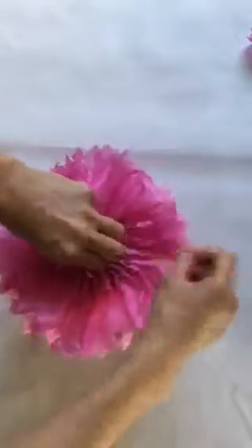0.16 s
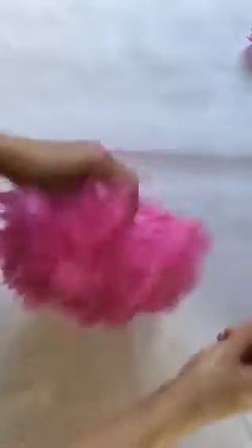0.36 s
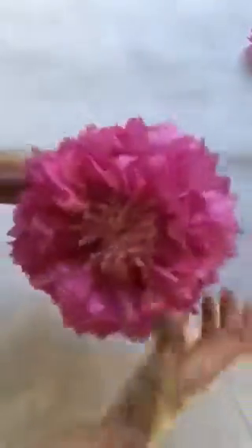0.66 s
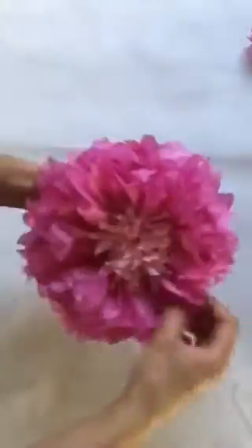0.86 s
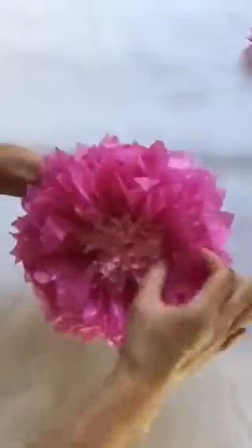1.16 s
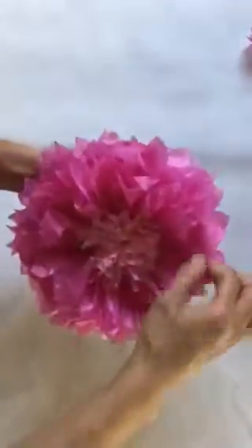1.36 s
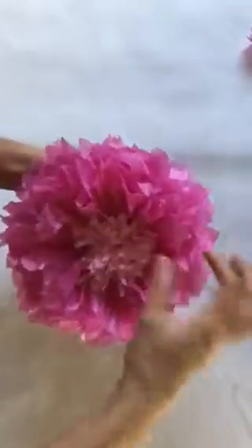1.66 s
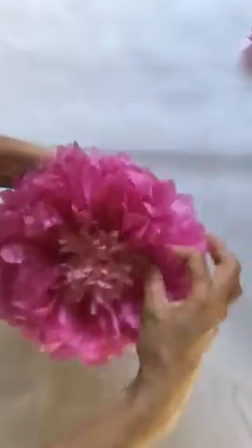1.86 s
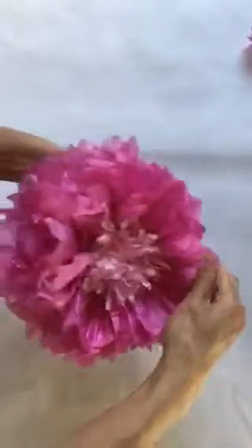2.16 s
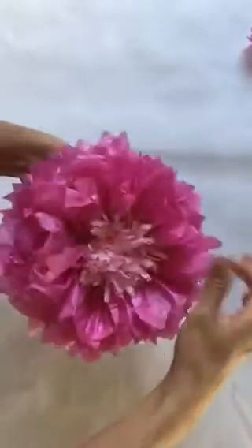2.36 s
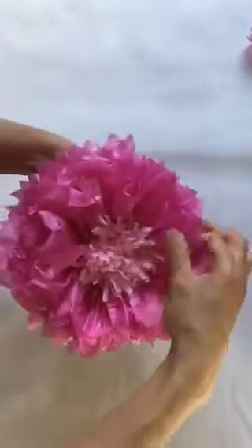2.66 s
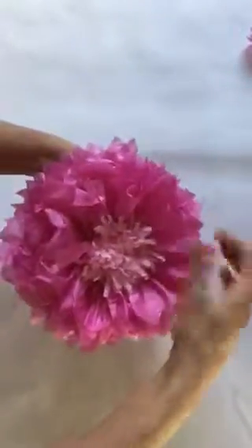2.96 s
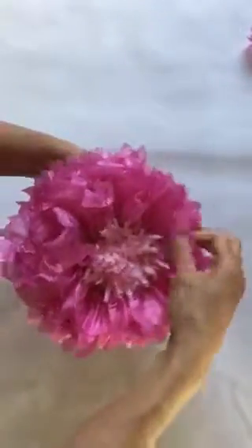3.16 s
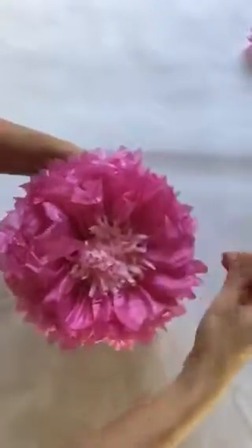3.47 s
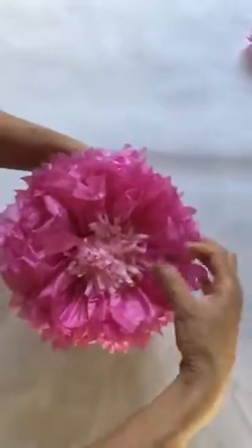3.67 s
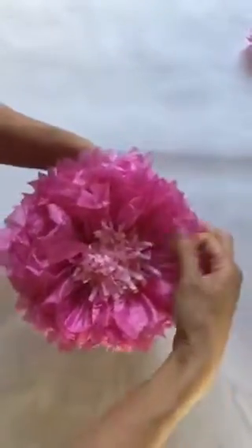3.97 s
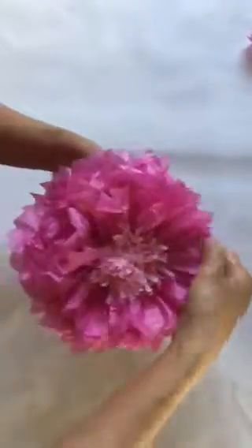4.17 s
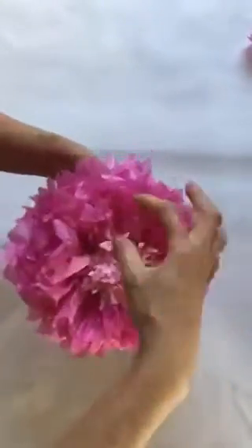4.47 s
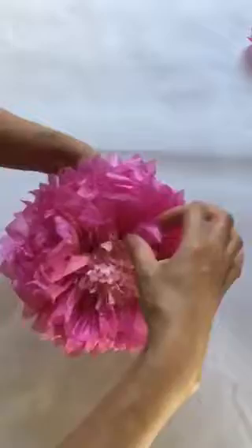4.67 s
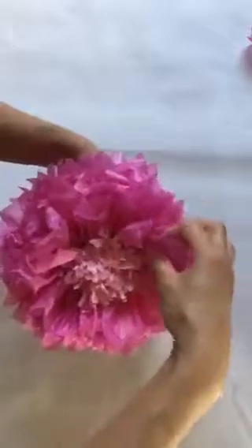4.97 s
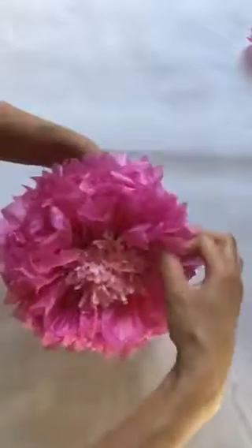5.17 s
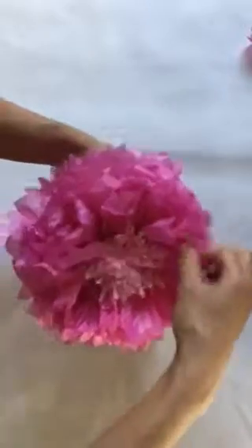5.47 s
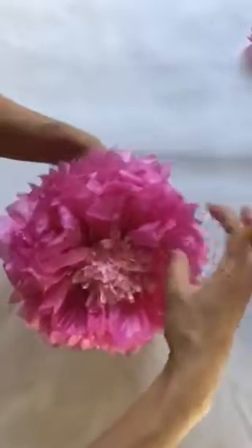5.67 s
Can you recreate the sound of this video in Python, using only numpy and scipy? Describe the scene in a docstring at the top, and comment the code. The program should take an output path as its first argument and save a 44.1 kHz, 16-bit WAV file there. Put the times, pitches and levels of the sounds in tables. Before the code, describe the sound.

Fingers pull apart and fluff a tissue paper flower, close to the microphone in a small, quiet room. Each tug is a short, bright shower of tiny crackles over a soft hiss of sliding sheets, with single creases popping sharply on top. A strong burst comes at about 0.2 seconds, along with a soft, dull hand bump. The paper quietens from 0.4 to 0.8, then crackles fully again around 0.9 and from 1.3 to 1.6. After a brief dip, uneven pulls run from 1.9 to 3.4, with another faint bump near 2. A short lull follows around 3.6. From 3.8 the tugs come close together, strongest near 4.1, 4.3, 4.7 and 5.6, where the sharpest snap sounds, and they ease off by 5.8. Faint room air and a low, wavering hum lie underneath throughout.

```python
"""A burst of crisp crackle: fingers pull apart and fluff a tissue-paper pompom, close up in a small room.
Pull after pull builds, holds and is let go. Each sets off a shower of tiny crease snaps that tick, shake
the petals and flap the whole sheets, over the soft hiss of layers sliding on each other. Single creases
pop out on top and the hand now and then bumps the bundle. Room air and a low hum lie underneath."""
import sys
import numpy as np
from scipy import signal
from scipy.fft import rfft, irfft
from scipy.io import wavfile
from scipy.ndimage import uniform_filter1d

SR = 44100
rng = np.random.default_rng(int(sys.argv[2]) if len(sys.argv) > 2 else 0)


def wrap_up_sound(samples):
    """Save the sound to the file named by the first command line argument, as 16-bit audio."""
    columns = np.atleast_2d(samples).T
    # keep every value between -1 and 1, then stretch to whole-number steps
    tamed = np.clip(columns, -1, 1)
    steps = np.round(tamed * 32767).astype(np.int16)
    wavfile.write(sys.argv[1], SR, steps)


N = 257103

# tone of the quiet room: (frequency [Hz], relative level [dB])
AIR_COLOUR = [(15, -36), (42, 5), (100, -3.5), (250, -5), (600, -11.5), (1600, -15), (5000, -26),
              (16000, -31)]
# swells and fades of the low hum: (time [s], relative level [dB])
HUM_SWELLS = [(0, -65), (0.6, -65.5), (1.7, -77), (2.05, -81), (2.35, -69.5), (2.9, -80), (3.25, -63),
              (3.65, -65), (4.1, -76), (4.4, -61.5), (5.3, -70.5), (5.8, -62)]
# dull knocks of the hand on the bundle: (time [s], relative level [dB])
HAND_BUMPS = [(0.192, -45), (0.234, -44), (1.697, -54.5), (1.749, -60), (1.982, -49.5), (3.579, -64),
              (5.219, -54)]
# tone of a knock: (frequency [Hz], relative level [dB])
BUMP_COLOUR = [(25, -34.5), (60, 3.5), (110, 3), (185, 9.0), (280, 5.5), (900, -46)]
# single creases that pop out of the crackle: (time [s], rms level as if spread over POP_S [dB])
CREASE_POPS = [(0.1398, -49), (0.2542, -23.5), (0.29, -27.5), (0.3961, -30.5), (0.4266, -39),
               (0.4677, -42.5), (0.504, -48), (0.582, -46), (0.6056, -49), (0.8291, -36), (1.1239, -44.5),
               (1.252, -43.5), (1.334, -32), (1.3862, -30), (1.3939, -25), (1.4497, -30), (1.803, -46.5),
               (1.8958, -33.5), (1.9418, -34), (1.9981, -24.5), (2.1146, -33), (2.2587, -32.5),
               (2.361, -37.5), (2.562, -55), (2.7198, -35), (2.7944, -32), (2.917, -31), (3.1204, -61),
               (3.153, -47), (3.2165, -28), (3.3355, -28), (3.4612, -42), (3.5007, -40), (3.8081, -33),
               (3.911, -39.5), (3.9714, -31.5), (3.996, -34), (4.049, -24.5), (4.0604, -26), (4.094, -26),
               (4.4396, -43.5), (4.4661, -42), (4.6175, -28), (4.72, -35), (4.8139, -32), (5.0333, -30),
               (5.071, -30), (5.1635, -26), (5.2088, -29), (5.3881, -35.5), (5.4698, -30.5), (5.506, -32),
               (5.6135, -21), (5.6657, -31)]
# tone of a pop: (frequency [Hz], relative level [dB])
CREASE_POP_COLOUR = [(100, -27), (500, -12.5), (1500, -8), (5000, -9.5), (9000, -5), (14000, 4.5),
                     (16000, 0), (17500, -17)]
# tone of the crackling paper: (frequency [Hz], relative level [dB])
PAPER_COLOUR = [(40, -24), (130, -15.5), (300, -8), (560, -5), (780, -7), (950, -2.5), (1450, 0),
                (2000, -4), (2800, -1.5), (4900, -1.5), (6000, 2), (7800, -1), (12000, 4.5), (15000, 7)]
# narrow rings of the bundle and its surroundings: (frequency [Hz], width [Hz], gain [dB])
BUNDLE_RINGS = [(237, 42, -11), (342.8, 7.2, 7), (480, 82, -9.5), (640, 13, 6), (1360, 79, -12),
                (9220, 900, -15)]
# pulls of the fingers, each opening a hollow in the paper: (time of full strength [s], growth time [s],
# hold [s], crackle drive [dB], extra body [dB], hollow pitch [Hz], hollow boost [dB])
FINGER_PULLS = [(0.0, 0.009, 0.05, -63.0, 0.0, 1070, 5), (0.149, 0.0093, 0.027, -41.5, -2.0, 940, 6),
                (0.186, 0.013, 0.1, -30.0, -0.5, 943, 3.5), (0.38, 0.036, 0.129, -49.5, 0.5, 3080, 3),
                (0.575, 0.029, 0.19, -57, 1.5, 3050, 4), (0.873, 0.034, 0.052, -36.0, 3, 470, -1),
                (0.922, 0.03, 0.11, -30.0, 3, 1465, -2), (1.258, 0.013, 0.3, -39.5, 0.5, 930, 4.5),
                (1.386, 0.0098, 0.0098, -30.0, 1.5, 2256, 5.5), (1.557, 0.018, 0.016, -37.0, 3, 2290, 0.5),
                (1.743, 0.015, 0.065, -66.5, 2.5, 930, 5.5), (1.894, 0.0068, 0.0046, -36.5, -1.5, 2150, 0),
                (1.934, 0.012, 0.2, -36.5, -0.5, 336, 3.5), (2.165, 0.037, 0.12, -41.5, 3.5, 340, 3),
                (2.376, 0.025, 0.044, -39.0, 3, 470.3, 3), (2.634, 0.003, 0.082, -36.5, -4.5, 1380, 3.5),
                (2.802, 0.056, 0.022, -36.0, -1.5, 1374, 4), (2.919, 0.05, 0.051, -38.5, 0.5, 1378, 0),
                (3.179, 0.0081, 0.055, -34.5, -0.5, 2633, 1.5), (3.3, 0.04, 0.12, -34.5, 0, 2607, 4.5),
                (3.731, 0.011, 0.18, -46.0, -1.0, 717.6, 3), (3.786, 0.014, 0.005, -40.5, -0.5, 1563, 9.5),
                (4.053, 0.043, 0.051, -30.5, -0.5, 1501, 6), (4.114, 0.018, 0.16, -38.0, 2.5, 1565, 6.5),
                (4.297, 0.03, 0.0136, -29.5, 2.5, 1548, 5), (4.638, 0.017, 0.027, -33.0, 1.0, 1511, 2),
                (4.714, 0.026, 0.025, -33.0, -1.0, 1372, 4), (4.778, 0.024, 0.031, -36.5, -4, 1510, 3.5),
                (4.858, 0.013, 0.089, -42.0, -5.0, 1508, 3), (4.964, 0.01281, 0.083, -39.0, -1, 1510, 3),
                (5.072, 0.01, 0.054, -36.5, -0.5, 1510, -0.5), (5.166, 0.037, 0.047, -35.0, -2.5, 3841, 5),
                (5.331, 0.053, 0.013, -38.0, -0.5, 1519, 1), (5.479, 0.056, 0.065, -41.5, -6, 1508, 2),
                (5.577, 0.063, 0.046, -32.0, 1.0, 1502, 4), (5.691, 0.026, 0.027, -38.5, 2.5, 1697, 2.5),
                (5.75, 0.013, 0.08, -44.0, -2.0, 748.5, 1)]

AIR_DB, HUM_TRIM_DB, HUM_HZ = -66, -1.5, 49
POP_S = .002
RELEASE_S, SETTLE_S, SETTLE_DB = .019, .10, -24.5  # on letting go: a quick stop, then a faint settling
FIRM_DB = -35  # crackle drive of a firm pull
SNAPS_PER_S, SNAP_SLOPE = 2600, .5  # snap rate in a firm pull, and how it follows the drive
# petals and sheets grow more slowly than the crackle: gain in a firm pull, and dB per dB of drive
PETAL_DB, PETAL_SLOPE = -32, 0.65
SHEET_DB, SHEET_SLOPE = -33, 0.59
CREASE_TRIM_DB, HOLLOW_Q, TOP_HZ = 1, 5, 16000


def undb(db):
    """Decibels to gain."""
    return 10 ** (np.asarray(db) / 20)


def unit(x):
    """Scale to rms 1."""
    return x / np.sqrt(np.mean(x ** 2))


def convolve(x, response):
    """Pass a sound through an impulse response."""
    return signal.fftconvolve(x, response)[:N]


def colour(x, points, size=4096):
    """Minimum-phase EQ through (frequency [Hz], level [dB]) points; white noise keeps its power."""
    hz, db = np.transpose(points)
    bins = np.maximum(np.fft.rfftfreq(size, 1 / SR), 1)
    gain = undb(np.interp(np.log(bins), np.log(hz), db))
    cepstrum = irfft(np.log(gain))
    cepstrum[1:size // 2] *= 2
    cepstrum[size // 2 + 1:] = 0
    response = irfft(np.exp(rfft(cepstrum)))
    return convolve(x, response / np.linalg.norm(response))


def resonate(x, hz, width_hz):
    """One resonance with gain 1 at its centre."""
    return signal.lfilter(*signal.iirpeak(hz, hz / width_hz, fs=SR), x)


def soft_band(x, low_hz, high_hz, pad=4096):
    """Band-pass with gentle skirts, so that neighbouring bands blend."""
    band = signal.butter(1, [low_hz, min(high_hz, .49 * SR)], "band", fs=SR, output="sos")
    return signal.sosfiltfilt(band, np.pad(x, pad))[pad:-pad]


def drift(per_s):
    """Smooth random modulation with rms 1, changing course per_s times a second."""
    step = max(int(SR / per_s), 2)
    stairs = np.repeat(rng.standard_normal(N // step + 1), step)[:N]
    return unit(uniform_filter1d(stairs, step))


def room_tone():
    """The bed: still room air and a low hum that wavers, swells and fades."""
    phase = 2 * np.pi * np.cumsum(HUM_HZ + .5 * drift(14.0)) / SR
    hum_db = np.interp(np.arange(N) / SR, *np.transpose(HUM_SWELLS))
    hum = unit(np.sin(phase)) * undb(hum_db + HUM_TRIM_DB)
    air = undb(AIR_DB) * colour(rng.standard_normal(N), AIR_COLOUR)
    return hum + air


def reflections(wet_db, t60_s, early_db, dull_hz):
    """Response from one spot on the paper: hands and table reflect at once, walls add a duller tail."""
    t = np.arange(SR // 3) / SR
    early = rng.standard_normal(len(t)) * np.exp(-t / 0.01) * (t > .001)
    tail = rng.standard_normal(len(t)) * np.exp(-np.log(1000) * t / t60_s) * (t > .006)
    tail = tail / np.linalg.norm(tail)
    tail = tail + 2.73 * signal.lfilter(*signal.butter(1, dull_hz, fs=SR), tail)
    response = undb(early_db) * early / np.linalg.norm(early) + undb(wet_db) * tail
    response[0] = 1  # direct sound
    return response


def hand_bumps():
    """The hand knocks softly against the bundle: short thuds of low noise."""
    t = np.arange(N) / SR
    envelope = sum(undb(db) * (t > s) * np.exp(-np.abs(t - s) / 0.04) for s, db in HAND_BUMPS)
    return undb(-5.5) * envelope * colour(rng.standard_normal(N), BUMP_COLOUR)


def snap(flutter_s, flutter, ring, size=512):
    """One crease buckles: a tick, a millisecond of flutter, and the pitch of its own facet."""
    t = np.arange(size) / SR
    tick = flutter * rng.standard_normal(size) * np.exp(-t / flutter_s)
    tick[0] += 1
    facet_hz = rng.uniform(7000, 16000)
    sound = tick + ring * resonate(tick, facet_hz, width_hz=2550)
    return sound / np.linalg.norm(sound)


def crease_pops():
    """The accents: larger creases give way one at a time, bright and dry."""
    out = np.zeros(N + SR)
    for s, db in CREASE_POPS:
        spot = reflections(wet_db=-14, t60_s=.26, early_db=-8, dull_hz=2000)
        tick = snap(flutter_s=0.00078, flutter=0.3, ring=0.68)
        pop = colour(signal.fftconvolve(tick, spot), CREASE_POP_COLOUR, size=512)
        gain = undb(db) * np.sqrt(POP_S * SR) / np.linalg.norm(pop)
        out[int(s * SR):][:len(pop)] += gain * pop
    return out[:N]


def snap_shower(per_s, spread_db, max_spreads, spots=20):
    """Creases snap at random moments from spots all over the paper; most are tiny, a few are large."""
    out = np.zeros(N)
    for _ in range(spots):
        onsets = np.flatnonzero(rng.random(N) < per_s / spots / SR)
        polarity = rng.choice([-1, 1], len(onsets))
        sizes_db = spread_db * np.minimum(rng.exponential(size=len(onsets)), max_spreads)
        kicks = np.zeros(N)
        kicks[onsets] = polarity * undb(sizes_db)
        spot = reflections(wet_db=-7.0, t60_s=0.3, early_db=-8.5, dull_hz=2050)
        tick = snap(flutter_s=0.00098, flutter=0.34, ring=1.52)
        out += convolve(kicks, signal.fftconvolve(tick, spot))
    # even out the shower's loudness, so the crackle swells and fades smoothly with each pull
    return out / np.sqrt(uniform_filter1d(out ** 2, size=1500) + 1e-6)


def air_pockets(x, count=36):
    """Pockets of air between the petals come and go as faint, shifting resonances."""
    for hz in np.geomspace(450, 9000, count):
        opening = undb(1.6 * drift(18)) - 1
        x = x + opening * resonate(x, hz, width_hz=30 + hz / 30)
    return unit(x)


def hollows(x, pitches_hz, boosts_db, shares):
    """Each pull opens one hollow, which colours the rustle as long as that pull leads."""
    return x + sum(share * (undb(db) - 1) * resonate(x, hz, hz / HOLLOW_Q)
                   for hz, db, share in zip(pitches_hz, boosts_db, shares))


def pull_envelope(full_s, growth_s, hold_s):
    """Each snap loosens more, so a pull grows exponentially; it holds, is let go, and the layers settle."""
    t = np.arange(N) / SR - full_s
    attack = np.exp(np.minimum(t, 0) / growth_s)
    released_s = np.maximum(t - hold_s, 0)
    release = np.exp(-released_s / RELEASE_S) + undb(SETTLE_DB) * np.exp(-released_s / SETTLE_S)
    return attack * release / (1 + undb(SETTLE_DB))


def pulled_paper():
    """Harder pulls crackle denser and brighter; the same snaps sound in creases, petals and sheets."""
    powers = np.array([(undb(db) * pull_envelope(s, growth, hold)) ** 2
                       for s, growth, hold, db, *_ in FINGER_PULLS])
    total_power = powers.sum(axis=0) + 1e-9
    shares = powers / total_power
    drive_db = 10 * np.log10(total_power)
    effort_db = drive_db - FIRM_DB
    *_, body_db, hollow_hz, hollow_db = np.transpose(FINGER_PULLS)

    per_s = SNAPS_PER_S * undb(SNAP_SLOPE * effort_db)
    flurries = undb(1.6 * drift(170))  # layers catch and let go
    snaps = unit(snap_shower(per_s, spread_db=3.0, max_spreads=4.5) * flurries)
    slide = undb(-14) * rng.standard_normal(N)  # sheets rub over each other
    rustle = hollows(air_pockets(snaps + slide), hollow_hz, hollow_db, shares)
    rustle = colour(rustle, PAPER_COLOUR)
    rustle = rustle + sum(undb(db) * resonate(rustle, hz, width) for hz, width, db in BUNDLE_RINGS)

    creases = soft_band(rustle, 3960, 23000) * undb(drive_db + CREASE_TRIM_DB)
    petals = soft_band(rustle, 990, 5340) * undb(PETAL_DB + PETAL_SLOPE * effort_db)
    sheets = soft_band(rustle, 64, 710) * undb(SHEET_DB + SHEET_SLOPE * effort_db)
    return creases + (petals + sheets) * undb(body_db @ shares)


def scene():
    """The mono mix: paper up close, a quiet room behind it."""
    return (pulled_paper() + crease_pops() + hand_bumps() + room_tone())[None]


def record(dry):
    """A steep low-pass takes off the very top."""
    return signal.sosfilt(signal.ellip(12, .1, 95, TOP_HZ, fs=SR, output="sos"), dry)


dry = scene()
out = record(dry)
wrap_up_sound(out)
```